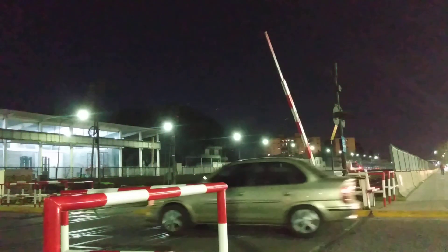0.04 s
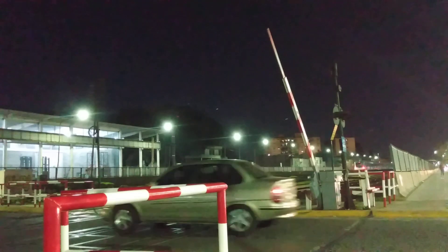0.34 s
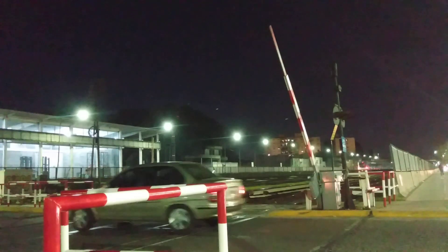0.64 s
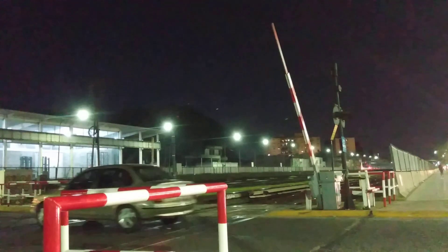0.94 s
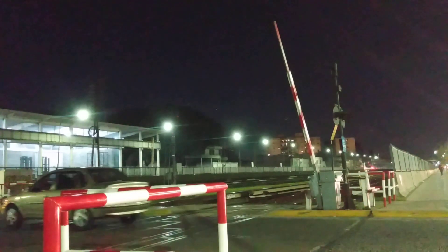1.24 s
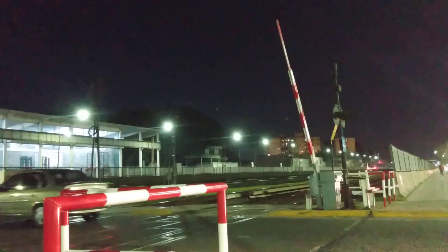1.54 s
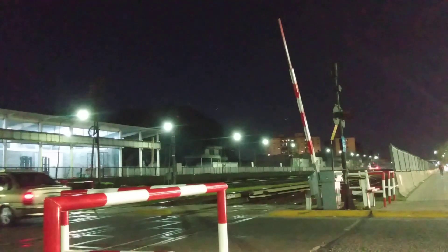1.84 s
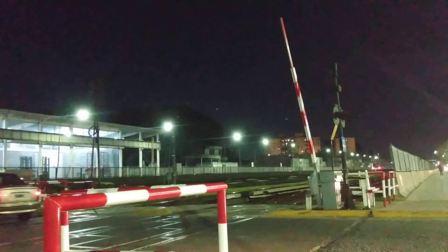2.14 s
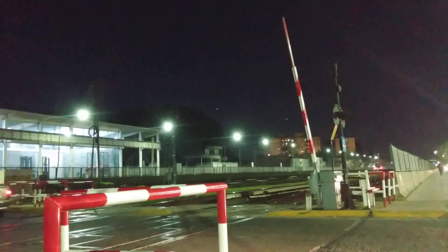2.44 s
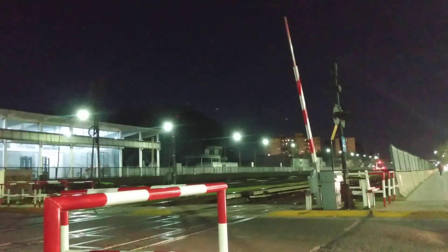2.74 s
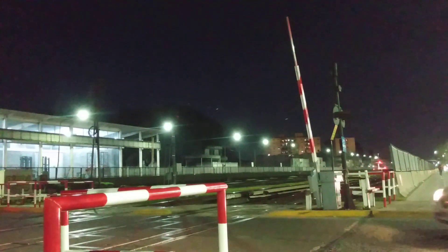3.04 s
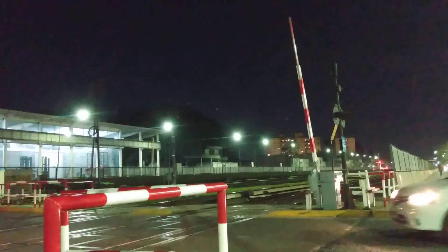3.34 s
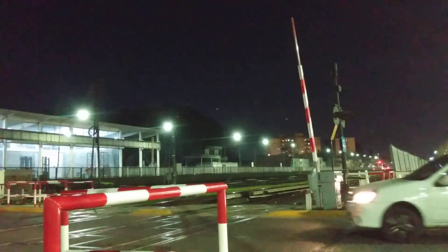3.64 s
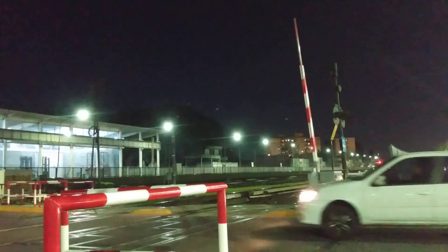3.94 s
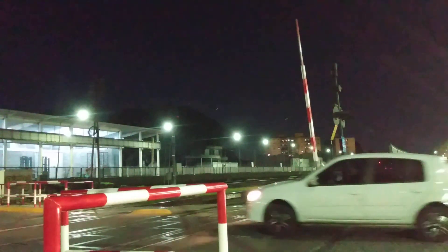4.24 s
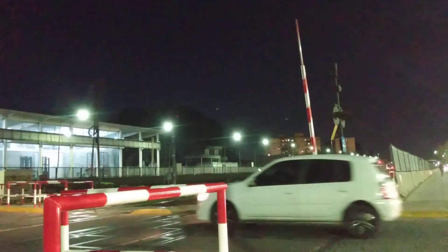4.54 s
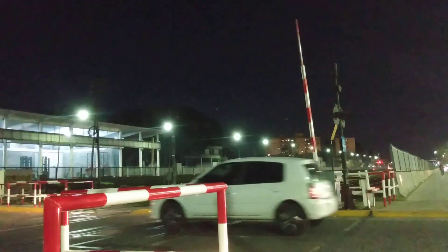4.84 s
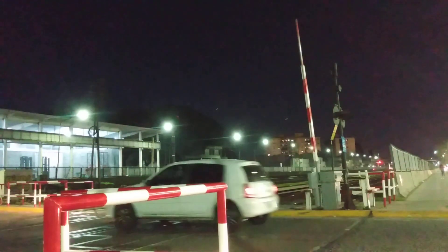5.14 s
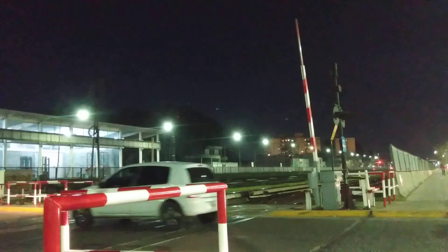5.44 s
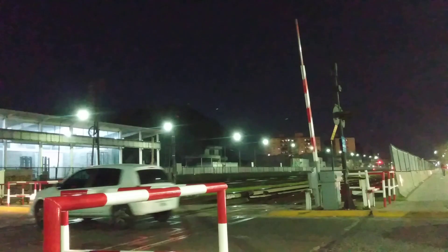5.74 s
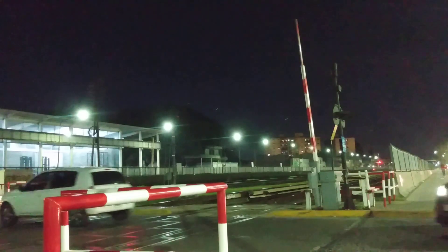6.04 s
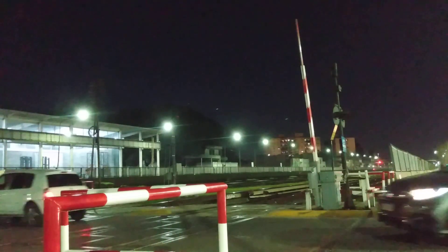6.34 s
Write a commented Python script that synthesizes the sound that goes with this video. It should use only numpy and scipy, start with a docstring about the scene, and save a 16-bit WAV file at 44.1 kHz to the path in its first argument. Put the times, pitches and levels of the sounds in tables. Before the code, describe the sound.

Queuing traffic rumbles steadily at a railway crossing in town. A car drones past close by, its pitch dropping as it leaves, then a second hums through in low gear with swelling surges. Tyres roar and sizzle on the damp road, snap bits of grit and thump over the rails. A very faint high whine comes and goes, and a thin brake squeal ends it. Heard in stereo from the roadside.

```python
"""Cars at a level crossing

Cars roll slowly over a railway crossing at night while queuing traffic rumbles.
A saloon drones past and lets its revs fall; a hatchback follows, pulling gently in low gear.
Tyres roar and hiss on the damp road, crack bits of grit and knock on the rails.
A thin, high whine comes and goes, and near the end a third car's brake squeals."""
import sys
import numpy as np
from scipy import signal
from scipy.fft import rfft, irfft, next_fast_len
from scipy.io import wavfile
from scipy.ndimage import uniform_filter1d, map_coordinates

SR = 44100
rng = np.random.default_rng(int(sys.argv[2]) if len(sys.argv) > 2 else 0)


def waveform_to_disk(signal):
    """Save audio, clipped to [-1, 1], as 16-bit WAV at the path in sys.argv[1]."""
    frames = np.transpose(np.atleast_2d(signal))
    scaled = np.clip(frames, -1, 1) * 32767
    samples = np.round(scaled).astype(np.int16)
    wavfile.write(sys.argv[1], SR, samples)


N = 290619

# The tone of each road noise, from deepest to brightest: frequency_hz, relative_db
RUMBLE_TONE = [(20, -54), (27, -39), (36, -33), (46, -10), (54, -13), (66, 0), (85, -7), (105, -11),
               (150, -9.5), (200, -12.5), (280, -32), (500, -68)]
BOOM_TONE = [(100, -4.5), (190, -5), (260, 0.5), (340, -5), (490, -8.5), (700, -14.5), (1200, -46),
             (3000, -72)]
ROAR_TONE = [(250, -20.5), (500, -4.5), (750, -1.5), (1050, 0), (1450, -7.5), (2100, -22), (3500, -45),
             (7000, -75)]
SIZZLE_TONE = [(600, -36), (1200, 2), (1600, 1.5), (2100, -0.5), (2800, -6.5), (3900, -12.5), (5000, -18),
               (6500, -25.5), (12000, -45)]
HISS_TONE = [(1000, -30), (2200, -16), (3800, 7.5), (6000, 0), (8500, -0.5), (11000, 0), (13000, -0.5),
             (15500, -2)]
# Car bodies rocking over the uneven track bed: peak_s, half_length_s, rumble_db, boom_db
BODY_JOLTS = [(.25, .2, -35.5, -58), (1.248, 0.42, -35, -49), (2.054, 0.13, -30, -60),
              (4.547, 0.18, -38, -38), (4.88, 0.18, -33.5, -56), (5.924, .1, -38, -38),
              (6.558, 0.077, -33.5, -39)]
# Tyres going by: nearest_s, half_length_s, roar_db
TYRE_PASSES = [(.25, 0.26, -43.5), (4.1, 1, -42), (6.35, .35, -42)]
# Tyres running through wet patches: nearest_s, half_length_s, sizzle_db, hiss_db
WET_PATCHES = [(-.05, .12, -49, -66), (1.65, 0.48, -46, -60.5), (2.45, 0.41, -48.5, -73),
               (3.7, 0.64, -47, -58), (6.75, .3, -54, -60.5)]
# The saloon's engine and its two strong tones: time_s, firing_hz, first_tone_db, second_tone_db
SALOON_ENGINE = [(0.0, 79.6, -31, -27), (0.08, 83.6, -29, -35), (0.37, 84.93, -47, -27.5),
                 (0.83, 83.88, -33.5, -31.5), (1.23, 87.63, -34.5, -49), (1.34, 86.54, -30.5, -32.5),
                 (1.48, 82.25, -38, -37), (1.5, 82.3, -22.5, -29.5), (1.69, 81.43, -31.5, -31.5),
                 (1.92, 70.3, -34, -27.5), (2.09, 59.8, -43, -33), (2.4, 50.94, -27, -30)]
# Each car's weaker exhaust tones: multiple_of_firing_rate, relative_db (to the two strong tones)
SALOON_WEAK_TONES = [(1.5, -12.5), (2.5, -16), (3, -12), (4, -15.5)]
HATCHBACK_WEAK_TONES = [(1, -17.5), (1.5, -17.5), (2.5, -24), (4, -17), (5, -11), (6, -22), (9, -11)]
# The hatchback's engine speed: time_s, firing_hz
HATCHBACK_SPEED = [(2.45, 49.6), (2.66, 55.02), (2.75, 56.52), (2.93, 53.84), (4.7, 57.48), (5.15, 56.35),
                   (5.22, 57.16), (5.4, 55.92), (6.59, 58.62)]
# The strength of its second exhaust tone: time_s, level_db
HATCHBACK_EFFORT = [(2.5, -35), (2.72, -23), (2.83, -32), (2.97, -24), (3.95, -30.5), (4.47, -25.5),
                    (4.85, -36.5), (5.55, -41.5), (5.85, -31), (6.59, -35.5)]
# Its third tone surges as it draws level: peak_s, half_length_s, level_db
HATCHBACK_SURGES = [(2.85, 0.24, -29), (3.283, 0.078, -22.5), (3.625, 0.1, -22.5), (3.884, .17, -24),
                    (4.46, 0.34, -27.5)]
# Spells of thin, high whine: start_s, end_s, level_db
WHINE_SPELLS = [(0, .2, -72), (1.2, 2.35, -72), (3.4, 3.75, -72)]
# Grit snapping under tyres: start_s, level_db, brightness_hz, steel_ring_db, ring_pitch_factor
GRIT_SNAPS = [(0.524, -47, 4130, 4, 1.14), (1.033, -28, 1500, -35, 1), (2.252, -34, 2026, -30, 1),
              (2.697, -45, 9940, -30, 1), (3.979, -47, 10000, -30, 1), (5.3076, -26, 646, -30, 1),
              (5.7179, -28, 2500, -5, 1), (5.9957, -23.5, 1603, -35, 1)]
# The notes of a struck rail and of a struck wheel: pitch_hz, relative_db, ring_time_s
RAIL_NOTES = [(2234, 4, 0.054), (3850, 11, 0.039), (4800, -22, .07), (5000, -27, .06)]
WHEEL_NOTES = [(272, -4.5, 0.057), (344, 11.5, 0.047), (440, 9.5, 0.03), (534, -11, 0.028),
               (819.5, -3, .015)]
# Wheels dropping into the rail gaps: start_s, level_db, pitch_factor
WHEEL_DROPS = [(0.634, -23, 1), (1.215, -21.5, 1.18), (1.237, -27, 0.83), (1.699, -22.5, 0.89),
               (1.813, -22, 0.97), (2.904, -24, 0.969), (2.99, -21, 0.81), (3.13, -23, 1.9),
               (5.3088, -25, 0.77), (5.367, -26, 1.15), (5.996, -29, 1.5)]
# The third car's brake touches, then bites: start_s, end_s, level_db
BRAKE_SPELLS = [(5.35, 6.3, -78), (6.33, 6.7, -68)]
# How alike the road noise is on the two sides: frequency_hz, likeness (1 means the same)
SIDE_LIKENESS = [(150, 1), (280, 0.98), (450, 0.81), (900, 0.45), (1400, 0.86), (2100, 0.72), (3200, 0.44),
                 (6000, 0.19), (12000, -0.05)]
# How much louder the left side is than the right: frequency_hz, difference_db
LEFT_BALANCE = [(150, 0.2), (750, 0), (1200, -2.5), (3000, -1), (5000, -4), (8500, -7.5), (14000, -6.5)]
# How far the left side lags behind the right: frequency_hz, delay_s
LEFT_DELAY = [(150, .00041), (300, .00032), (500, .00028), (750, .00045), (1050, .0005), (1500, .000453)]

# the steady noise of the queue and the town
QUEUE_RUMBLE_DB, QUEUE_BOOM_DB, QUEUE_ROAR_DB = -36, -37, -40.5
QUEUE_SIZZLE_DB, QUEUE_HISS_DB = -46.5, -65
SIZZLE_LEAD_S = .12  # the sizzle is thrown ahead of a car
SPEED_WANDER_HZ = 0.252  # an engine never holds its speed exactly
WAVER_DB = 1.07  # each strong exhaust tone wavers on its own
LOW_CUT_HZ, TOP_HZ = 28.4, 15720


def amp(db):
    """Turn decibels into a number to multiply by."""
    return 10 ** (np.asarray(db) / 20)


def unit(x):
    """Scale x to an average power of 1."""
    return x / np.sqrt(np.mean(x ** 2) + 1e-20)


def along(points, hz):
    """Read between a table's rows, on a scale of octaves."""
    frequencies, values = np.transpose(points)
    return np.interp(np.log(hz + 1), np.log(frequencies + 1), values)


def curves(rows):
    """Join a table's rows over time, giving one curve for each column after the first."""
    times, *columns = np.transpose(rows)
    return [np.interp(np.arange(N) / SR, times, column) for column in columns]


def wobble(rate):
    """A smooth curve through `rate` random points a second."""
    points = rng.standard_normal(N // 8)
    return map_coordinates(points, [np.arange(N) * rate / SR], mode="wrap")


def filtered(x, response):
    """Reshape x with a gain that depends on frequency."""
    size = next_fast_len(N + SR // 4)
    return irfft(rfft(x, size) * response(np.fft.rfftfreq(size, 1 / SR)), size)[..., :N]


def nearness(s, half_s):
    """How near something is as it goes straight past: 1 at time s."""
    return 1 / np.hypot(1, (np.arange(N) / SR - s) / half_s)


def swell(s, half_s):
    """A smooth rise and fall that peaks at 1 at time s."""
    return np.exp(-.5 * ((np.arange(N) / SR - s) / half_s) ** 2)


def held(start, end, fade_s):
    """1 from start to end, fading outside."""
    t = np.arange(N) / SR
    return np.clip(np.minimum(t - start, end - t) / fade_s + 1, 0, 1)


def together(steady_db, gains):
    """Add the power of passing sounds to a steady level."""
    return np.sqrt(amp(steady_db) ** 2 + sum(gain ** 2 for gain in gains))


def rush(tone, patchy_db):
    """Stereo street noise with random louder and softer patches."""
    slices = signal.stft(rng.standard_normal((2, N)), nperseg=512)[2]
    patches = uniform_filter1d(rng.standard_normal(slices.shape[1:]), size=7, axis=0)
    patches = uniform_filter1d(patches, size=16, axis=1)
    pair = signal.istft(slices * amp(patchy_db * unit(patches)), nperseg=512)[1][:, :N]
    width = lambda hz: np.arccos(np.clip(along(SIDE_LIKENESS, hz), -1, 1)) / 2
    mid, side = filtered(pair, lambda hz: amp(along(tone, hz)) * [np.cos(width(hz)), np.sin(width(hz))])
    return unit(np.array([mid + side, mid - side]))


def idle(hz, wander_hz, throb_db):
    """Cars waiting in the queue throb on a wandering low note."""
    phase = 2 * np.pi * np.cumsum(hz + wander_hz * wobble(12)) / SR
    return unit(amp(throb_db * wobble(6.1)) * np.sin(phase))


def traffic():
    """The queue rumbles, and car bodies boom as they rock over the tracks."""
    rumble_gain = together(QUEUE_RUMBLE_DB, [amp(db) * swell(s, half) for s, half, db, _ in BODY_JOLTS])
    boom_gain = together(QUEUE_BOOM_DB, [amp(db) * swell(s, half) for s, half, _, db in BODY_JOLTS])
    idling = amp(-5.5) * idle(hz=52.2, wander_hz=3.6, throb_db=-0.5)
    rumble = amp(0.82 * wobble(13)) * (rush(RUMBLE_TONE, patchy_db=0.36) + idling)
    boom = amp(1.3 * wobble(14)) * rush(BOOM_TONE, patchy_db=0.7)
    return rumble_gain * rumble + boom_gain * boom


def tyres():
    """Tyre tread roars on the road and sizzles through wet patches."""
    passes = [amp(db) * nearness(s, half) for s, half, db in TYRE_PASSES]
    patches = [amp(db) * nearness(s - SIZZLE_LEAD_S, half) for s, half, db, _ in WET_PATCHES]
    roar = amp(0.17 * wobble(12)) * rush(ROAR_TONE, patchy_db=0.65)
    sizzle = amp(0.6 * wobble(160)) * rush(SIZZLE_TONE, patchy_db=1.0)
    return together(QUEUE_ROAR_DB, passes) * roar + together(QUEUE_SIZZLE_DB, patches) * sizzle


def droplets(per_second, spread_db):
    """Tiny separate snaps of water and sand."""
    sizes = amp(spread_db * rng.standard_normal((2, N)).clip(-2, 2)) * rng.choice([-1, 1], (2, N))
    snaps = sizes * (rng.random(N) < per_second / SR)
    return unit(filtered(snaps, lambda hz: amp(along(HISS_TONE, hz))))


def spray():
    """Fine spray hisses off the damp road in tiny bursts."""
    gain = together(QUEUE_HISS_DB, [amp(db) * nearness(s, half) for s, half, _, db in WET_PATCHES])
    bursts = amp(0.46 * wobble(700) + .75 * wobble(25))
    hiss = bursts * rush(HISS_TONE, patchy_db=1.6)
    return gain * unit(hiss + amp(-11.5) * droplets(per_second=55, spread_db=4))


def exhaust(firing_hz, low_db, high_db, weak_tones, open_db, multiple, flutter_db, jitter):
    """Tones follow the engine's firing rate; the pipe booms on one multiple of it and the next."""
    phase = 2 * np.pi * np.cumsum(firing_hz + SPEED_WANDER_HZ * wobble(7)) / SR
    phase += jitter * wobble(30)  # uneven firing shakes the timing of all the tones
    tone = lambda k, drift=0: np.sqrt(2) * np.sin(k * phase + drift + rng.uniform(0, 2 * np.pi))
    drone = amp(low_db + WAVER_DB * wobble(8)) * tone(multiple)
    drone += amp(high_db + WAVER_DB * wobble(8)) * tone(multiple + 1)
    for k, db in weak_tones:
        silencer_db = -14 * np.log2(np.maximum(k * firing_hz / 200, 1))  # softens tones above 200 Hz
        level_db = (low_db + high_db) / 2 + db + open_db + silencer_db + 1.6 * wobble(9)
        drone += amp(level_db) * tone(k, drift=.5 * wobble(14))
    return drone * amp(flutter_db * wobble(35))  # it shakes their strength too


def saloon():
    """The first car's exhaust drones, drops in pitch and softens as it drives off."""
    drone = exhaust(*curves(SALOON_ENGINE), SALOON_WEAK_TONES,
                    open_db=0, multiple=1, flutter_db=.9, jitter=.06)
    return drone * amp(-3.5 * swell(2.43, half_s=.14))


def squeal(spells, rest_db, hz, spread_hz, left_db):
    """A thin, unsteady high tone that comes in spells: the whine or the brake."""
    phase = 2 * np.pi * np.cumsum(hz + spread_hz * wobble(300)) / SR
    gain = together(rest_db, [amp(db) * held(start, end, fade_s=.035) for start, end, db in spells])
    sides = amp([[left_db / 2], [-left_db / 2]])
    return gain * amp(2.7 * wobble(18)) * np.sin(phase) * sides


def struck(notes, t, pitch):
    """A struck part rings on several dying notes, at new strengths for every blow."""
    ring = sum(amp(db + rng.normal(0, 1.1) - 60 * t / ring_s) * np.sin(2 * np.pi * hz * pitch * t)
               for hz, db, ring_s in notes)
    return ring / np.abs(ring).max()


def grit():
    """Small stones crack under the tread, and some ping off the rail."""
    out, t = np.zeros(N + SR), np.arange(SR // 8) / SR
    for s, db, hz, ring_db, pitch in GRIT_SNAPS:
        fade = amp(-60 * t / 0.0037) + amp(-20 - 60 * t / 0.085)  # a sharp snap and a soft tail
        band = signal.butter(3, [hz / 2, min(hz * 1.4, TOP_HZ)], "bandpass", fs=SR, output="sos")
        crack = signal.sosfilt(band, fade * rng.standard_normal(len(t)))
        ping = amp(ring_db) * struck(RAIL_NOTES, t, pitch)
        out[round(s * SR):][:len(t)] += amp(db + 1) * (crack / np.abs(crack).max() + ping)
    lead_s = .0003  # takes back part of the left side's delay
    return filtered(out[:N], lambda hz: np.exp(1j * np.pi * hz * lead_s * np.array([[1], [-1]])))


def knocks():
    """Each rail gap thumps a wheel and its suspension."""
    out, t = np.zeros(N + SR), np.arange(SR // 4) / SR
    for s, db, pitch in WHEEL_DROPS:
        out[round(s * SR):][:len(t)] += amp(db + 1) * struck(WHEEL_NOTES, t, pitch)
    return out[:N]


def hatchback():
    """The second car's exhaust hums in low gear and booms in surges."""
    (firing_hz,), (second_db,) = curves(HATCHBACK_SPEED), curves(HATCHBACK_EFFORT)
    surges = [amp(db) * swell(s, half) for s, half, db in HATCHBACK_SURGES]
    third_db = 20 * np.log10(together(second_db - 5.5, surges))
    open_db = 7 * swell(4, half_s=.17)  # the weak tones rise as the tailpipe swings into view
    return exhaust(firing_hz, second_db, third_db, HATCHBACK_WEAK_TONES,
                   open_db, multiple=2, flutter_db=.5, jitter=.02)


def scene():
    """Everything at the crossing, with the saloon fading into the hatchback."""
    whine = squeal(WHINE_SPELLS, rest_db=-83, hz=14000, spread_hz=18, left_db=14)
    brake = squeal(BRAKE_SPELLS, rest_db=-np.inf, hz=12550, spread_hz=170, left_db=-2)
    road = traffic() + tyres() + spray()
    saloon_share = held(0, HATCHBACK_SPEED[0][0], fade_s=0.089)
    engines = saloon_share * saloon() + (1 - saloon_share) * hatchback()
    return road + engines + knocks() + grit() + whine + brake


def record(dry):
    """Make the left side duller and slightly late; cut the deepest bass and highest treble."""
    def sides(hz):
        balance_db, delay_s = along(LEFT_BALANCE, hz), along(LEFT_DELAY, hz)
        return np.array([amp(side * balance_db / 2) * np.exp(-1j * np.pi * hz * delay_s * side)
                         for side in (1, -1)])
    low_cut = signal.butter(6, LOW_CUT_HZ, "highpass", fs=SR, output="sos")
    return filtered(signal.sosfilt(low_cut, dry), lambda hz: sides(hz) * (hz < TOP_HZ))


dry = scene()
out = record(dry)
waveform_to_disk(out)
```